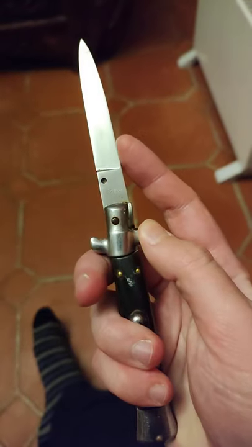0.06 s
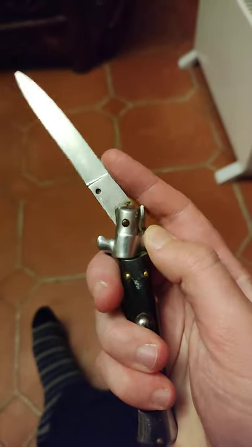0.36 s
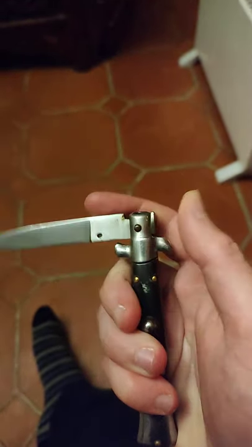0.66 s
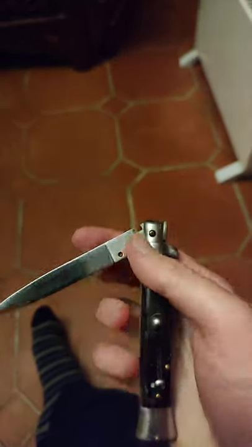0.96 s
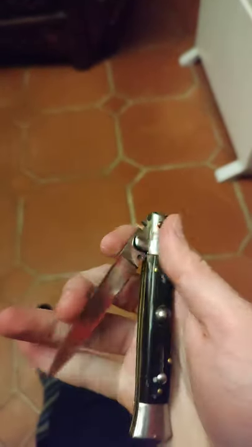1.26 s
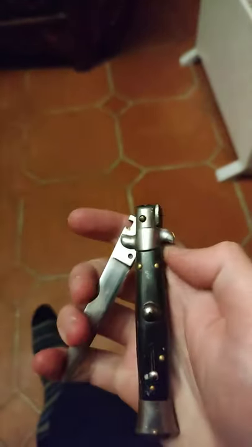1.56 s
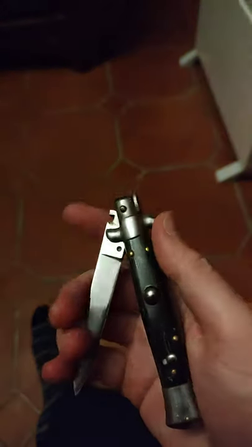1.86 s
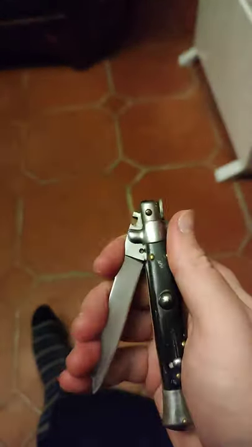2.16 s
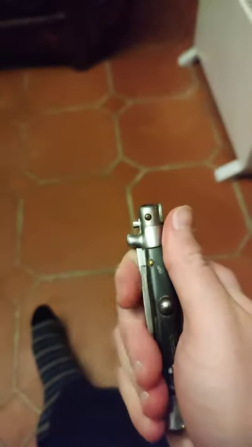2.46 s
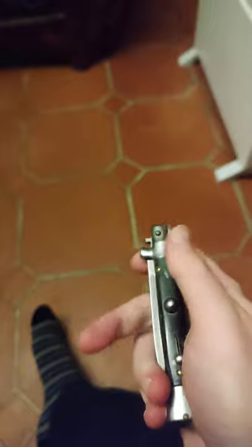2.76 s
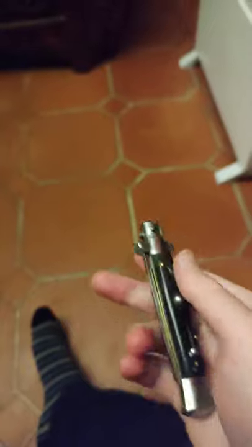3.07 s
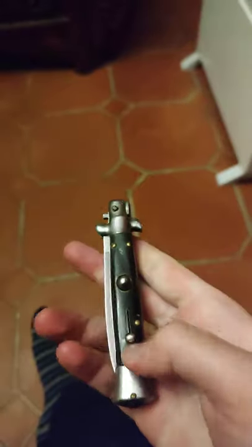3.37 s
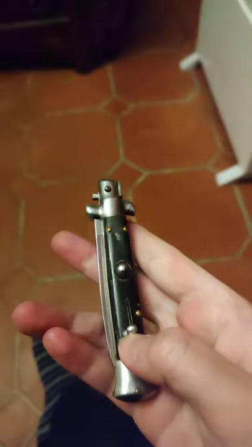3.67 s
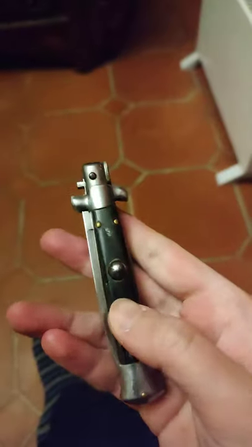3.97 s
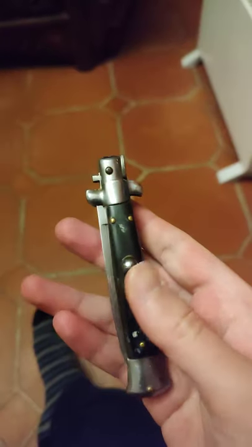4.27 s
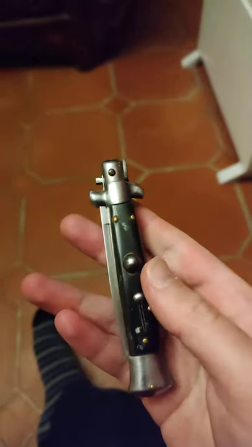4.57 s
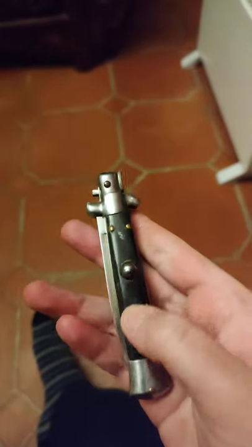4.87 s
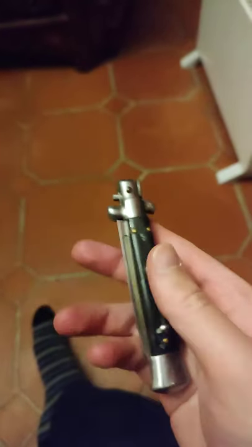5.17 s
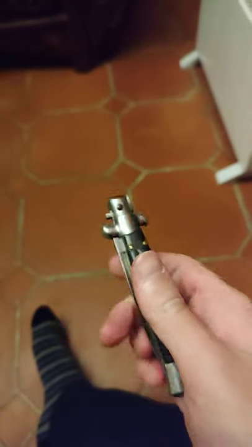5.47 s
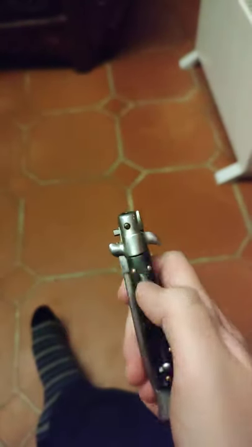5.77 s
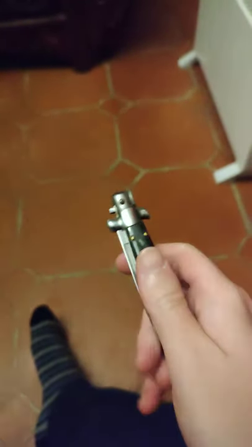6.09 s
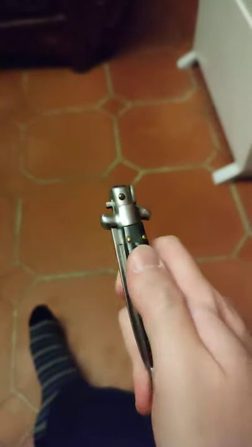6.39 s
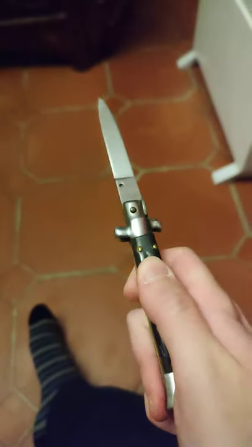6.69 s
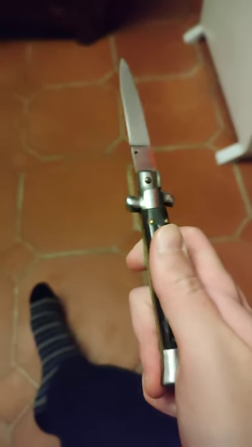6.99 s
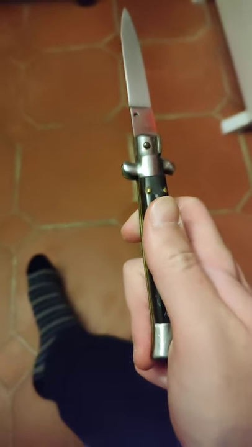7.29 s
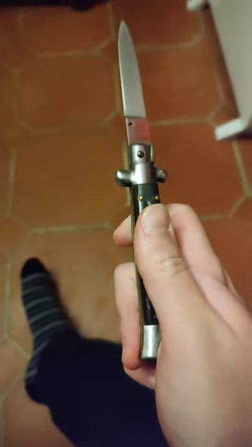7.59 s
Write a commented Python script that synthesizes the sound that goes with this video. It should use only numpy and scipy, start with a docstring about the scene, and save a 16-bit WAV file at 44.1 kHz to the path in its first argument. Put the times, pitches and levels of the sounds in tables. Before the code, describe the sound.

A switchblade folds shut with two quick, sharp metallic clicks. Very faint ticks and rubs follow as a thumb works the safety slide. About four seconds after closing, the blade springs open and slams into its lock with a louder snap that overloads the close microphones with a low thump. A small tiled room adds a short, bright echo over quiet room tone.

```python
"""Faint ticks and rubs over room tone: a hand turns a switchblade in a small tiled room.
The blade folds shut in two snaps, the thumb works the safety slide, then the blade springs open and
slams into its lock. Each impact excites the modes of the steel, sliding friction gives grainy noise,
and the tiles return a short bright echo. The hardest snaps overload the two nearby microphones,
which thump as they recover."""
import sys
import numpy as np
from scipy import signal
from scipy.fft import rfft, irfft, next_fast_len
from scipy.io import wavfile
from scipy.ndimage import uniform_filter1d, map_coordinates

SR = 44100
rng = np.random.default_rng(int(sys.argv[2]) if len(sys.argv) > 2 else 0)


def transcribe(u):
    """Save the signal u as a 16-bit wav file named by the first command-line argument.

    u: samples, shape (n,) or (channels, n), limited to [-1, 1]; the rate is SR.
    q: integer samples, one column per channel.
    """
    v = np.clip(np.atleast_2d(u).T, -1, 1)
    q = np.round(v * 32767).astype(np.int16)
    wavfile.write(sys.argv[1], SR, q)


N = 345744


def amp(db):
    """Level in decibels as an amplitude ratio."""
    return 10 ** (np.asarray(db) / 20)


def unit(x):
    """Normalisation to rms 1."""
    return x / np.sqrt(np.mean(x ** 2) + 1e-20)


def along(points, hz):
    """Interpolation of (f/Hz, value) points on a logarithmic frequency axis."""
    f, v = np.transpose(points)
    return np.interp(np.log(hz + 1), np.log(f + 1), v)


def filtered(x, response):
    """Linear filtering: the spectrum of x times a frequency response."""
    n = x.shape[-1]
    m = next_fast_len(n + SR // 4)
    return irfft(rfft(x, m) * response(np.fft.rfftfreq(m, 1 / SR)), m)[..., :n]


def causal(gain):
    """Minimum phase: the response with this gain that rings only after the blow."""
    cepstrum = irfft(np.log(np.maximum(gain, 1e-6)))
    half = len(cepstrum) // 2
    return np.exp(rfft(np.r_[cepstrum[0], 2 * cepstrum[1:half], np.zeros(half)]))


def add(track, s, sound):
    """Superposition of a sound on a track, from s seconds on."""
    part = track[:, round(s * SR):][:, :sound.shape[1]]
    part += sound[:, :part.shape[1]]


def wobble(rate):
    """Spline interpolation of random knots, rate of them a second."""
    return map_coordinates(rng.standard_normal(int(N * rate / SR) + 4), [np.arange(N) * rate / SR])


def chatter(t, length):
    """Micro-impacts merge into a brief broadband pulse, partly coherent between the microphones."""
    noise = rng.standard_normal((3, len(t)))
    common = np.array([noise[2], np.roll(noise[2], shift=2)])
    burst = (noise[:2] + .6 * common) * t / length * np.exp(-2 * t / length)
    for _ in range(2):
        whitened = irfft(np.exp(1j * np.angle(rfft(burst))))
        burst = whitened * np.exp(-(t / (4 * length)) ** 2)
    return burst / np.linalg.norm(burst, axis=1, keepdims=True)


# background noise: f/Hz, relative spectral level/dB
NOISE_SPECTRUM = [(12, -32), (20, 12), (33, -16), (54, -9.5), (123, -19), (186, -20.5), (219, -22.5),
                  (258, -22.5), (331, -25), (914, -33.5), (1080, -33.5), (1420, -35.5), (2600, -37.5),
                  (9470, -46), (14300, -42)]
# its likeness at the two microphones: f/Hz, correlation coefficient
NOISE_CORRELATION = [(60, -0.17), (180, 0.44), (550, 0.088), (1650, 0.067), (4970, 0.05), (15000, -0.4)]
# its balance: f/Hz, left minus right level/dB
NOISE_BALANCE = [(60, -3), (180, -2.5), (550, -2.0), (1650, -1.5), (4970, 0), (15000, -2)]


def room_tone(level_db=-74.5, edge_hz=14350, drift_db=0.14):
    """Partly correlated noise: room tone, its low part drifting slightly, under microphone hiss."""
    def mid_side_gain(hz):
        angle = np.arccos(np.clip(along(NOISE_CORRELATION, hz), -1, 1)) / 2
        return amp(along(NOISE_SPECTRUM, hz)) * (hz < edge_hz) * [np.cos(angle), np.sin(angle)]

    mid, side = filtered(rng.standard_normal((2, N)), mid_side_gain)
    pair = np.array([mid + side, mid - side])
    pair = filtered(pair, lambda hz: amp(np.outer([.5, -.5], along(NOISE_BALANCE, hz))))
    pair /= np.std(filtered(mid, lambda hz: hz > 100))
    drift = amp(drift_db * wobble(rate=1.2))
    low = filtered(pair, lambda hz: 1 / (1 + (hz / 1500) ** 2))
    return amp(level_db) * (pair + (drift - 1) * low)


# reverberation time of the room: f/Hz, T60/s
REVERB_TIME = [(200, .2), (1300, 0.46), (3300, 0.47), (5700, 0.45), (9000, 0.32), (14000, 0.34)]
# spectrum of the wall reflections: f/Hz, relative level/dB
WALL_SPECTRUM = [(200, -7.5), (1000, -4.5), (2200, -4), (3400, 0), (5700, -1), (10000, -2), (14000, 0.5)]


def reverberation(x, walls_db=-18, floor_db=-29, floor_s=.011, build_s=0.0013):
    """Convolution with the room's impulse response: a floor reflection in a decaying diffuse field."""
    hz, t, bands = signal.stft(rng.standard_normal((2, SR * 3 // 4)), SR, nperseg=256)
    decay = np.exp(-np.log(1000) * t / along(REVERB_TIME, hz)[:, None])
    tail = signal.istft(bands * decay * amp(along(WALL_SPECTRUM, hz))[:, None], SR, nperseg=256)[1]
    age = np.arange(tail.shape[1]) / SR
    tail *= 1 - np.exp(-(age / build_s) ** 2)
    tail *= amp(walls_db) / np.linalg.norm(tail[0])
    add(tail, floor_s, amp(floor_db) * chatter(age[:SR // 10], length=0.002))
    return signal.fftconvolve(x, tail, axes=1)[:, :N]


def shudder(s=6.74, db=-47, rise_s=0.008, fade_s=0.12, edge_hz=55):
    """Exponential decay of a low flutter after the recoil."""
    out, t = np.zeros((2, N)), np.arange(SR) / SR
    flutter = unit(filtered(rng.standard_normal((2, SR)), lambda hz: hz / (1 + (hz / edge_hz) ** 4)))
    add(out, s, amp(db) * flutter * (1 - np.exp(-t / rise_s)) * np.exp(-t / fade_s))
    return out


# strokes of thumb and steel: t/s, duration/s, final level/dB
STROKES = [(0.657, 0.073, -80.5), (2.336, 0.01, -61.5), (3.329, 0.023, -76.5), (3.844, .045, -69.5),
           (4.139, 0.024, -71), (4.895, 0.089, -67.5), (5.495, .18, -80), (7.009, 0.028, -72.5)]
# friction noise: f/Hz, relative spectral level/dB
FRICTION_SPECTRUM = [(300, -24.5), (1100, -16), (1500, -6), (2200, -5.5), (3200, 1), (4000, -3.5),
                     (4900, 5), (5900, -3), (7400, 1), (8800, -2.5), (9700, -11.5), (11000, -6.5),
                     (14000, -7.5), (14700, -34)]


def rubs(grain=.6, attack_s=.005, release_s=.01, swell_db=7.5):
    """Stick-slip friction: a run of tiny catches, louder as each stroke presses harder."""
    t, pressure = np.arange(N) / SR, np.zeros(N)
    for s, length, db in STROKES:
        gate = np.clip((t - s) / attack_s, 0, 1) * np.exp(-np.maximum(t - s - length, 0) / release_s)
        pressure += gate * amp(db - swell_db * np.clip(1 - (t - s) / length, 0, 1))
    catches = np.exp(grain * unit(uniform_filter1d(rng.standard_normal(N), size=60)))
    friction = catches * rng.standard_normal((2, N))
    return pressure * unit(filtered(friction, lambda hz: amp(along(FRICTION_SPECTRUM, hz))))


# modes of blade and liners: f/Hz, bandwidth/Hz, peak height/dB, T60/s
STEEL_MODES = [(1860, 550, 4.5, 0.017), (2700, 400, 6, .03), (3205, 150, 7, 0.11), (3550, 200, 4.5, 0.15),
               (4050, 180.5, 6.5, 0.11), (4750, 250, 6, .04), (5330, 250, 5.5, .06), (5834, 280, 6, 0.059),
               (6500, 170, 5.5, .04), (7070, 250, 7, .05), (7456, 290, 6.5, .04), (7600, 170, 3, .05),
               (7960, 260, 4.5, .03), (8760, 270, 10.5, 0.028), (9800, 200, 5.5, .03),
               (11050, 220, 4.5, .03), (11950, 386, 3, .03), (13300, 500, 5, .02)]
# impact spectrum beneath the modes: f/Hz, relative level/dB
IMPACT_SPECTRUM = [(200, -4), (600, -17.5), (1200, -14), (1900, -6.5), (3100, -5), (3850, -9.5),
                   (5500, -6.5), (8500, -5), (10400, -7.5), (14000, -7)]


def contact(length, knock_db, treble_db, pan_db, spots, mode_depth, ring_db, knock_hz, spot_width=.05):
    """Modal excitation: a crack, then free decay; the struck point favours spots (f/Hz, gain/dB)."""
    size = 8192
    t, hz = np.arange(size) / SR, np.fft.rfftfreq(size, 1 / SR)
    f, width, lift, t60 = np.transpose(STEEL_MODES)[:, :, None]
    lift = lift + rng.standard_normal((2, len(f), 1))  # each microphone hears its own mix of modes
    peaks = (lift / (1 + (2 * (hz - f) / width) ** 2)).sum(1)
    favoured = sum(db / (1 + ((hz / centre - 1) / spot_width) ** 2) for centre, db in spots)
    shelves = knock_db / (1 + (hz / knock_hz) ** 4) + treble_db / (1 + (10000 / (hz + 1)) ** 12)
    spectrum_db = along(IMPACT_SPECTRUM, hz) + shelves + mode_depth * peaks + favoured
    response = np.array([causal(amp(side)) for side in spectrum_db])
    crack = unit(irfft(rfft(chatter(t, length)) * response))
    phase = rng.uniform(0, 2 * np.pi, lift.shape)
    modes = amp(lift) * np.exp(-np.log(1000) * t / t60) * np.sin(2 * np.pi * f * t + phase)
    ring = unit(modes.sum(1) * (1 - np.exp(-t / length)))
    return (crack + amp(ring_db) * ring) * amp([[pan_db / 2], [-pan_db / 2]])


# taps of pivot, button and slide: t/s, relative level/dB, favoured f/Hz, relative body/dB
LIGHT_TAPS = [(0.1047, -54.5, 2780, -1), (1.0035, -61, 3090, -6), (2.2952, -45.5, 4320, -13),
              (2.6494, -51.5, 2630, -6), (3.3309, -47, 4400, -15.5), (3.855, -53, 5080, -9.5),
              (4.0519, -59, 5600, -17.5), (4.145, -56, 4860, 0), (4.1611, -59.5, 2895, -8),
              (4.9521, -56.5, 3420, -20), (4.9766, -51, 4800, -22), (6.9475, -54, 3040, -6),
              (7.001, -59, 4300, -8), (7.0136, -53.5, 2740, -18.5), (7.0244, -58.5, 2200, -6)]


def ticks(gain_db=-25, spot_db=7, damped_hz=8900, damped_db=-5):
    """Damped impacts: loose parts tap under the hand, and the fuller a tap, the duller."""
    out = np.zeros((2, N))
    for s, db, spot_hz, body_db in LIGHT_TAPS:
        tick = contact(length=0.0016, knock_db=body_db + 11, treble_db=-14 - 0.25 * body_db, pan_db=-1,
                       spots=[(spot_hz, spot_db), (damped_hz, damped_db)], spot_width=0.07,
                       mode_depth=0.65, ring_db=-21, knock_hz=3970)
        add(out, s, amp(db + gain_db) * tick)
    return out


# ringing of the seated blade, folded and then open: t/s, level/dB, f/Hz
BLADE_RINGS = [(2.435, -46, 3346), (6.646, -52, 5620)]


def blade_rings(rise_s=0.0013, t60_s=0.28, width_hz=180):
    """Beating: close modes of blade and back spring fade as a narrow band of noise."""
    out, t = np.zeros((2, N)), np.arange(SR) / SR
    envelope = (1 - np.exp(-t / rise_s)) * np.exp(-np.log(1000) * t / t60_s)
    for s, db, centre_hz in BLADE_RINGS:
        noise = rng.standard_normal((2, SR))
        cluster = unit(filtered(noise, lambda hz: 1 / (1 + (2 * (hz - centre_hz) / width_hz) ** 4)))
        add(out, s, amp(db) * cluster * envelope)
    return out


# blows of blade, catch and lock: t/s, relative level/dB, knock (bass shelf)/dB,
# left minus right level/dB, lower favoured f/Hz, upper favoured f/Hz
HARD_IMPACTS = [(1.3584, -44.5, -30, -2.5, 3300, 6350), (2.361, -20, -8, 2, 4700, 9300),
                (2.3626, -14, -11, -3.5, 7370, 7830), (2.3655, -28, -5, .5, 5200, 7040),
                (2.3957, -36.5, -6, 1.5, 2420, 4000), (2.4346, -11.7, .5, -1, 2850, 4400),
                (6.6161, -21.5, 0, 6, 3100, 5900), (6.6175, -12.5, -4, 3.5, 5870, 9400),
                (6.636, -27, -5, -6.5, 3000, 11000), (6.644, -13.5, 4.5, -0.5, 5400, 9000)]


def snaps(direct_db=-20, room_db=-21.3, open_s=6.6, uncovered_db=3.5):
    """Impact radiation of steel on steel: returns the direct sound and the sound sent into the room."""
    direct, spread = np.zeros((2, 2, N))
    for s, db, knock_db, pan_db, low_hz, high_hz in HARD_IMPACTS:
        length = 0.0013 * np.exp(.008 * knock_db)  # a heavier blow lasts longer
        treble_db = -2 + 0.32 * knock_db  # and is brighter
        glance_db = -.2 * knock_db  # a lighter one favours its two resonances more
        spots = [(low_hz, 6 + glance_db), (high_hz, 5 + glance_db)]
        near = contact(length, knock_db, treble_db, pan_db, spots,
                       mode_depth=0.79, ring_db=-24, knock_hz=1910)
        add(direct, s, amp(db + direct_db) * near)
        # summed over all directions, the modal peaks even out
        diffuse = contact(length, knock_db, treble_db, 0, spots,
                          mode_depth=0.26, ring_db=-25.5, knock_hz=1900)
        # the open blade is clear of the hand's cover
        add(spread, s, amp(db + room_db + uncovered_db * (s > open_s)) * diffuse)
    return direct, spread


def scene():
    """Superposition of the knife's direct sound, its reverberant field and the background."""
    direct, spread = snaps()
    handling = ticks() + rubs()
    return direct + blade_rings() + handling + reverberation(spread + handling) + shudder() + room_tone()


# jumps of microphone bias: t/s, left step/full scale, right step/full scale, rise/s, recovery/s
BIAS_STEPS = [(2.3639, 0.0073, -0.043, 0.0005, 0.0076), (2.4379, .018, -0.04, 0.00042, 0.02),
              (6.62, .008, -0.13, 0.00013, 0.013), (6.6447, -.36, -0.15, 0.00021, .028),
              (6.7404, 0.26, 0.026, 0.0026, 0.17)]


def thumps(swing=.8):
    """Relaxation: each overload shifts the bias, which leaks back to rest with a slight overshoot."""
    out, t = np.zeros((2, N)), np.arange(2 * SR) / SR
    for s, left, right, rise, recovery in BIAS_STEPS:
        leak = np.exp(-t / recovery) * np.cos(swing * t / recovery)
        add(out, s, np.outer([left, right], (1 - np.exp(-t / rise)) * leak))
    return out


def record(dry, blocked_s=(6.6445, 6.7405), blocked_db=-8, ceiling=.8, top_hz=16600):
    """Overload and band limiting: the left microphone briefly loses sensitivity; both thump and clip."""
    t = np.arange(N) / SR
    blocked = uniform_filter1d(1.0 * ((t > blocked_s[0]) & (t < blocked_s[1])), size=64)
    heard = dry * amp(np.outer([blocked_db, 0], blocked)) + thumps()
    clipped = np.clip(heard, -ceiling, ceiling)
    droop = [(14150, 0), (14500, -17), (16600, -32)]  # f/Hz, gain/dB
    return filtered(clipped, lambda hz: amp(along(droop, hz)) * (hz < top_hz))


dry = scene()
out = record(dry)
transcribe(out)
```